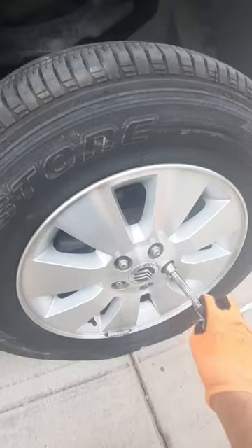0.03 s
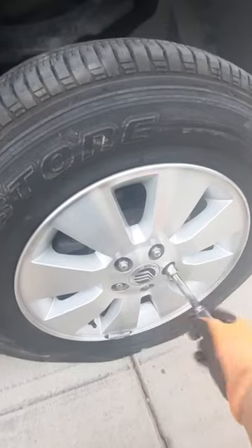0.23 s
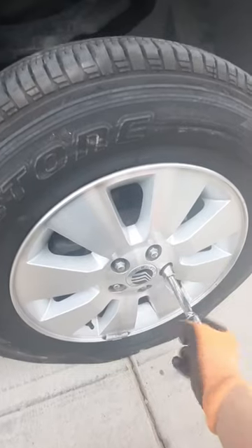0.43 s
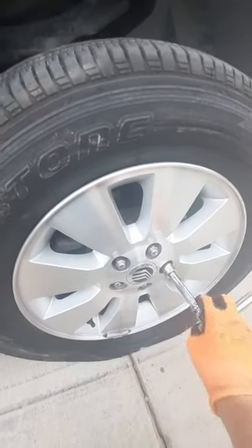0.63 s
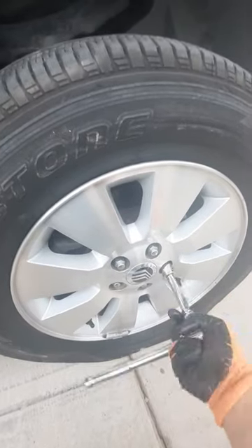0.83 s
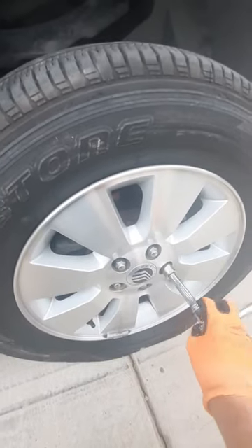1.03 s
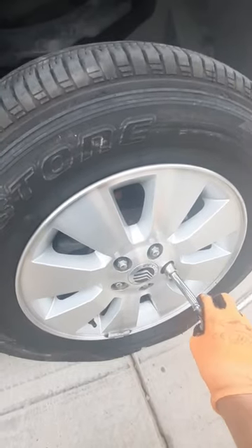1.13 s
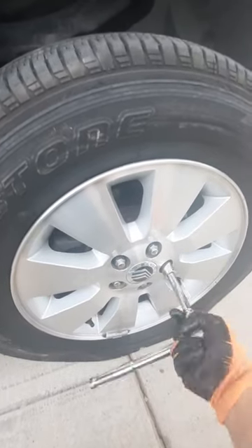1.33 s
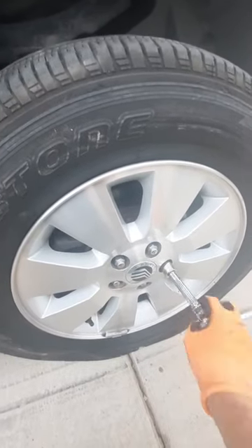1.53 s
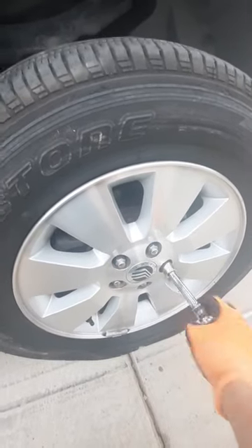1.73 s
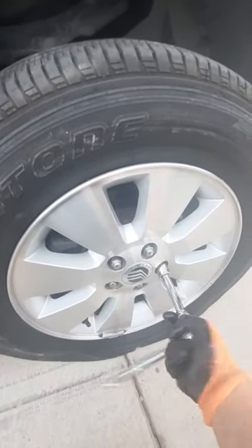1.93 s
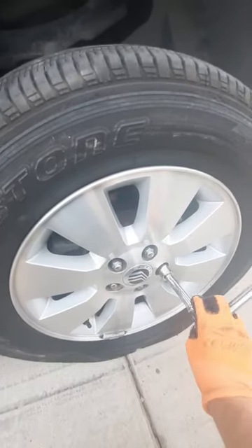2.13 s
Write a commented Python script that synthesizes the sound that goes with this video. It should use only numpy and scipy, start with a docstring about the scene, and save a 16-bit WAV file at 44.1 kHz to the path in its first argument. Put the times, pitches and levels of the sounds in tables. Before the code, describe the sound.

A ratchet wrench rasps four times on a car's lug nut, each run of clicks speeding up, then slowing, with a light steel ring. Soft knocks and faint rubbing follow each swing, above a low outdoor rumble.

```python
"""On a driveway, a socket ratchet turns a nut on an alloy car wheel, over a low outdoor rumble.
On each back swing a small catch, the pawl, rattles over the teeth, speeding up and then slowing to
a few separate clicks; these make the steel tool and the wheel ring. Then the pawl catches, the socket
knocks on the nut, and the forward stroke is only a faint rubbing. The car body and the yard echo."""
import numpy as np
import sys
import numpy as np
from scipy import signal
from scipy.fft import rfft, irfft, next_fast_len
from scipy.io import wavfile
from scipy.ndimage import uniform_filter1d

SR = 44100
rng = np.random.default_rng(int(sys.argv[2]) if len(sys.argv) > 2 else 0)


def generate_wav(signal):
    """Clip the signal to [-1, 1] and save it as 16-bit WAV at the path in sys.argv[1]."""
    frames = np.transpose(np.atleast_2d(signal))
    scaled = np.clip(frames, -1, 1) * 32767
    pcm = np.round(scaled).astype(np.int16)
    wavfile.write(sys.argv[1], SR, pcm)


N = 96887
LEAD_IN = SR // 2   # samples before time zero, so earlier sounds can ring on
TOTAL = N + LEAD_IN
BOUNCE_S = .003   # the pawl bounces this long on each tooth


def from_db(db):
    """Turn decibels into a number to multiply by."""
    return 10 ** (np.asarray(db) / 20)


def coloured(x, table, channels=(1, 1)):
    """Make each pitch as loud as a table says; channels picks the column for each ear."""
    table, size = np.array(table, float), next_fast_len(TOTAL + SR // 4) // 2 * 2
    log_hz = np.log(np.maximum(np.arange(size // 2 + 1) * SR / size, 1))
    gains = from_db([np.interp(log_hz, np.log(table[:, 0]), table[:, c]) for c in channels])
    # fold the filter so that no sound comes out before it goes in
    cepstrum = irfft(np.log(gains))
    cepstrum[:, 1:size // 2] *= 2
    cepstrum[:, size // 2 + 1:] = 0
    return irfft(rfft(x, size) * np.exp(rfft(cepstrum)))[:, :TOTAL]


def stereo_noise(likeness):
    """White noise; likeness is the share that both ears have in common."""
    white = rng.standard_normal((3, TOTAL))
    return np.sqrt(likeness) * white[0] + np.sqrt(1 - likeness) * white[1:]


def impulses(times, sizes):
    """One sharp tap at each time."""
    samples = (np.asarray(times) * SR).astype(int) + LEAD_IN
    return np.bincount(np.clip(samples, 0, TOTAL - 1), sizes, TOTAL)


def fading(power, decay_s):
    """Each burst of power dies away; its wave height falls to 37% in decay_s."""
    return signal.lfilter([1], [1, -np.exp(-2 / (decay_s * SR))], power + 1e-18)


def ring(taps, hz, ring_s):
    """Each tap starts a pure tone that fades by 60 dB in ring_s."""
    fade, turn = from_db(-60 / (ring_s * SR)), 2 * np.pi * hz / SR
    return signal.lfilter([0, np.sin(turn)], [1, -2 * fade * np.cos(turn), fade * fade], taps + 1e-18)


def outdoor_air():
    """A steady low rumble, nearly alike in both ears, and a faint hiss."""
    # tone of the rumble and of the hiss: pitch_hz, level_db
    rumble = [(15, -72), (25, -58), (40, -48.5), (62, -32), (100, -28.5), (120, -28.5), (150, -32.5),
              (180, -34.5), (230, -49.5), (400, -48.5), (500, -61.5), (620, -38.5), (850, -69.5),
              (1500, -66.5), (3000, -72.5), (9000, -78.5)]
    hiss = [(200, -55), (1000, -60.5), (3000, -73.5), (6300, -64), (9000, -86.5), (12000, -72),
            (15000, -79)]
    return coloured(stereo_noise(likeness=.97), rumble) + coloured(stereo_noise(likeness=0), hiss)


def wheel_ring(times, speed, db):
    """The stud under the nut carries the clicks into the wheel, which rings on faintly."""
    # the wheel's own tones: pitch_hz, level_db, ring_s
    wheel_tones = [(397, -63.5, 0.061), (604, -63.5, 0.62), (660, -58, 0.067), (752, -59, 0.095),
                   (987, -62.5, 0.4), (1250, -69.5, 0.15), (2159, -61.5, 0.39), (3270, -59, 0.52),
                   (4600, -60.5, 0.43)]
    wander, twin_gap_hz, twin_gain = 7.35, 9.2, .61   # wander is in radians per root second
    energy = impulses(times, from_db(db + 3 * speed) ** 2)
    energy = uniform_filter1d(energy, size=200, origin=99).clip(0)
    t, out = np.arange(TOTAL) / SR, 0
    for hz, level_db, ring_s in wheel_tones:
        phase = np.cumsum(2 * np.pi * hz / SR + wander * rng.standard_normal(TOTAL) / np.sqrt(SR))
        stored = fading(energy, ring_s / np.log(1000))
        # a weaker twin tone just above makes the ring throb
        gap_hz = twin_gap_hz * (.5 + rng.random())
        twin = twin_gain * np.sin(phase + 2 * np.pi * (gap_hz * t + rng.random()))
        out = out + from_db(level_db) * np.sqrt(stored) * (np.sin(phase) + twin)
    return out


def thread_rubbing():
    """The nut turns on its thread: a grainy rubbing that swells and stops with each forward stroke."""
    # forward strokes: start_s, end_s, level_db
    strokes = [(-.12, .18, 0.5), (.46, .76, -1), (.96, 1.2, -1), (1.47, 1.73, -9), (2.0, 2.3, -1)]
    # tone of the rubbing: pitch_hz, left_db, right_db
    colour = [(200, -75, -50), (620, -44, -57.5), (1000, -48.5, -66), (1910, -68.5, -56.5),
              (6300, -64.5, -56), (8800, -71, -80), (12200, -82.5, -60), (15000, -89.5, -61.5)]
    grains_per_s = 270
    t = (np.arange(TOTAL) - LEAD_IN) / SR
    push = sum(from_db(db) * np.sin(np.pi * np.clip((t - start) / (end - start), 0, 1))
               for start, end, db in strokes)
    grains = fading(rng.random(TOTAL) < grains_per_s / SR, decay_s=.004)
    rubbing = push * np.sqrt(grains / grains.mean()) * stereo_noise(likeness=0)
    return coloured(rubbing, colour, channels=(1, 2))


def socket_knocks(times, speed, db):
    """The loose socket knocks dully on the nut, and rattles on it when the swing is fast."""
    # knocks and brief grinds: start_s, level_db, rise_s, decay_s
    knocks = [(.15, -25.5, 0.00045, 0.01), (0.29, -8.5, 0.0027, .012), (0.33, -5, 0.0064, 0.006),
              (0.476, -20, 0.0043, 0.036), (0.51, -13, 0.0019, 0.0098), (0.591, -23.5, 0.0011, 0.005),
              (0.671, -19.5, 0.0019, 0.042), (.836, -6, 0.018, 0.01), (.958, -2.5, 0.0013, 0.0076),
              (0.982, -10.5, 0.0036, 0.005), (1.352, -4.5, 0.0097, 0.0053), (1.486, -12, 0.001, 0.017),
              (1.884, -18, 0.0094, 0.018), (1.943, -10, 0.0013, 0.024), (2.018, -17.5, 0.00067, 0.029)]
    # tone of a knock: pitch_hz, level_db
    colour = [(20, -61), (100, -36), (230, -34), (310, -15), (365, -21), (418, -14.5), (480, -21.5),
              (550, -12.5), (645, -6.5), (700, -14), (765, -10.5), (920, -30), (1050, -20.5), (1500, -24.5),
              (2200, -30), (5000, -30), (9000, -47), (15000, -58)]
    rattle_db, lean_left_db = db - 18.5 + 9 * speed, 1.36
    power = fading(impulses(times, from_db(rattle_db) ** 2), decay_s=.0094)
    for start_s, knock_db, rise_s, decay_s in knocks:
        shape = fading(fading(impulses([start_s], [1]), 2 * rise_s), decay_s)
        power = power + from_db(knock_db) ** 2 * shape / shape.max()
    knocking = coloured(np.sqrt(power) * stereo_noise(likeness=.82), colour)
    return knocking * from_db([[lean_left_db], [-lean_left_db]])


def tooth_drops():
    """The pawl drops once per tooth. Gives times, speeds (0 is usual, +1 twice as fast) and levels."""
    # one list per back swing, the first over before time zero: time_s, teeth_per_s, level_db
    swings = [
        [(-.26, 140, -4), (-.16, 250, 7), (-.085, 70, -9)],
        [(.2532, 130, -1.5), (.275, 198, 1.5), (.345, 245, 0), (.382, 192, 0.5), (.412, 105, 2.5),
         (.428, 51, 0.5)],
        [(.7405, 138, -1.5), (.77, 210, 1), (.835, 255, 1.5), (.872, 195, -0.5), (.898, 90, 2),
         (.9152, 58, 3.5)],
        [(1.2535, 132, -2.5), (1.283, 198, 1.5), (1.335, 260, -1), (1.37, 235, -1), (1.402, 130, 2),
         (1.4138, 88, 3)],
        [(1.7946, 140, -3), (1.84, 250, -1), (1.893, 280, 1), (1.925, 195, -2), (1.946, 105, -0.5),
         (1.9622, 46, 2.5)],
    ]
    usual_teeth_per_s, usual_jitter_s, spread_db = 215.4, .0006, 1.05
    drops = []
    for swing in swings:
        time_s, rate, db = np.transpose(swing)
        t = np.linspace(time_s[0], time_s[-1], SR // 20)
        passed = np.cumsum(np.interp(t, time_s, rate)) * (t[1] - t[0])
        count = max(round(passed[-1]), 1) + 1
        times = np.interp(np.linspace(0, passed[-1], count), passed, t)
        time_luck, level_luck = rng.standard_normal((128, 2))[:count].T
        speed = np.log2(np.interp(times, time_s, rate) / usual_teeth_per_s)
        jitter = usual_jitter_s * 2 ** speed * time_luck   # fast teeth skip more unevenly
        jitter[0] = jitter[-1] = 0
        drops.append([times + jitter, speed, np.interp(times, time_s, db) + spread_db * level_luck])
    return np.hstack(drops)


def pawl_clicks(times, db):
    """Each drop of the pawl is a gritty cluster of bounces, followed by a short chatter."""
    # tone of a click: pitch_hz, left_db, right_db
    colour = [(200, -72, -43), (870, -33, -60), (1500, -48, -27), (1950, -30.5, -32), (2390, -31, -22.5),
              (2900, -22.5, -17.5), (3640, -21, -23.5), (4500, -24.5, -14), (5700, -24.5, -15.5),
              (6200, -24, -9.5), (7960, -25, -31), (9280, -34.5, -31), (10300, -26.5, -27),
              (12470, -27.5, -16), (15200, -30.5, -17)]
    t = np.arange(SR // 100) / SR
    bounces = np.sqrt(t) * np.exp(-(2 * t / BOUNCE_S) ** 2)
    power = impulses(times, from_db(db + 2.5) ** 2)
    power = np.convolve(power, bounces / bounces.sum())[:TOTAL]
    snap, chatter = fading(power, decay_s=.00097), .6 * fading(power, decay_s=.0036)
    grit = np.exp(.14 * rng.standard_normal(TOTAL))   # the tiny contacts are uneven
    grit /= np.sqrt(np.mean(grit ** 2))
    clicks = np.sqrt(2 * (snap + chatter)) * stereo_noise(likeness=.067) * grit
    return coloured(clicks, colour, channels=(1, 2))


def tool_ring(times, speed, db):
    """Each click makes the steel handle and socket ring briefly; now and then a tone swells."""
    # the tool's own tones: pitch_hz, left_db, right_db, ring_s, db_per_doubling_of_speed
    tool_tones = [(2780, -45, -38.5, .018, 19.5), (3113, -32.5, -36.5, 0.037, 16),
                  (4720, -43, -22.5, 0.011, 2), (4794, -40.5, -31.5, 0.036, 8),
                  (6335, -32, -24.5, 0.042, 5), (11900, -55, -30.5, 0.029, -16),
                  (14080, -43.5, -61, .015, 11)]
    # swells of the ringing: middle_s, half_length_s, pitch_hz, boost_db
    swells = [(0.354, .02, 4800, 12.5), (0.386, .012, 6335, 15.5), (0.87, .02, 6200, 8.5),
              (1.378, .015, 4800, 15.5), (1.392, .012, 6650, 17.5), (1.897, .018, 4930, 14.5),
              (1.923, .01, 6540, 18.5)]
    swell_width_hz, out = 500, np.zeros((2, TOTAL))
    for hz, left_db, right_db, ring_s, speed_db in tool_tones:
        strike_db = db + speed_db * np.maximum(speed, -.5)
        for middle_s, half_s, swell_hz, boost_db in swells:
            distance = ((times - middle_s) / half_s) ** 2 + ((hz - swell_hz) / swell_width_hz) ** 2
            strike_db += boost_db * np.exp(-distance)
        strike_s = times + BOUNCE_S / 2 * rng.random(512)[:len(times)]
        signs = rng.choice([-1, 1], size=512)[:len(times)]
        tone = ring(impulses(strike_s, from_db(strike_db) * signs), hz, ring_s)
        late_tone = np.roll(tone, round(SR / hz / 4))   # a quarter wave late at the left ear
        out += [from_db(left_db) * late_tone, from_db(right_db) * tone]
    return out


def yard_echo(x, ring_s, channels):
    """The car body and the yard throw sound back as a fading wash, its bass alike in both ears."""
    # tone of the echoes: pitch_hz, short_echo_db, long_echo_db
    colour = [(300, -22, -7.5), (1500, -6, -22), (3000, -5.5, -25), (6000, -17.5, -18.5),
              (9000, -6.5, -44.5), (14000, -29, -24)]
    delay_s, wide_above_hz = .002, 400
    t = np.arange(SR // 2) / SR
    middle, side = rng.standard_normal((2, len(t)))
    side = signal.sosfilt(signal.butter(2, wide_above_hz, "high", fs=SR, output="sos"), side)
    tail = np.array([middle + side, middle - side]) * from_db(-60 * t / ring_s) * (t > delay_s)
    tail /= np.sqrt(np.sum(tail ** 2, axis=1, keepdims=True))
    blended = x + x[::-1] / 2   # each ear also gets half of the other side
    return coloured(signal.fftconvolve(blended, tail, axes=1)[:, :TOTAL], colour, channels)


def scene():
    """Add up the ratchet, the wheel, their echoes, the rubbing and the outdoor air."""
    # the pawl catches or shifts between swings: time_s, level_db
    catches = [(0.2465, -23.5), (0.475, -10), (0.569, -39), (0.6703, -27.5), (0.736, -20), (0.973, -9),
               (0.9757, -12), (1.1083, -33.5), (1.2492, -21.5), (1.482, -13), (1.4846, -14), (1.6288, -31),
               (1.6529, -33.5), (1.781, -30.5), (2.0183, -9.5)]
    catch_s, catch_db = np.transpose(catches)
    times, speed, db = tooth_drops()
    click_s, click_db = np.r_[times, catch_s], np.r_[db, catch_db]
    click_speed = np.r_[speed, np.zeros_like(catch_s)]
    work = pawl_clicks(click_s, click_db) + tool_ring(click_s, click_speed, click_db)
    work += wheel_ring(times, speed, db) + socket_knocks(times, speed, db)
    echoes = yard_echo(work, ring_s=.1, channels=(1, 1)) + yard_echo(work, ring_s=.27, channels=(2, 2))
    air = outdoor_air()
    return (work + thread_rubbing() + echoes + air)[:, LEAD_IN:]


def record(dry):
    """Take out the deepest bass, round off the peaks and cut the highest treble."""
    low_cut_hz, high_cut_hz = 16, 15600
    thinned = signal.sosfilt(signal.butter(2, low_cut_hz, "high", fs=SR, output="sos"), dry)
    return signal.sosfilt(signal.ellip(12, .2, 70, high_cut_hz, fs=SR, output="sos"), np.tanh(thinned))


dry = scene()
out = record(dry)
generate_wav(out)
```